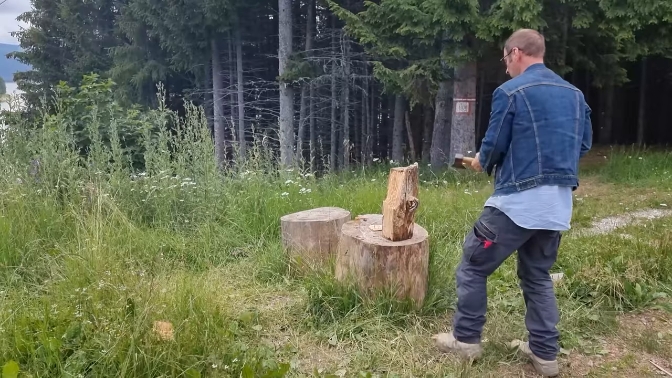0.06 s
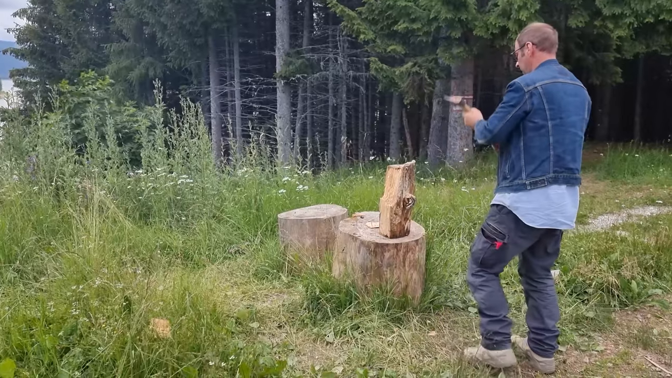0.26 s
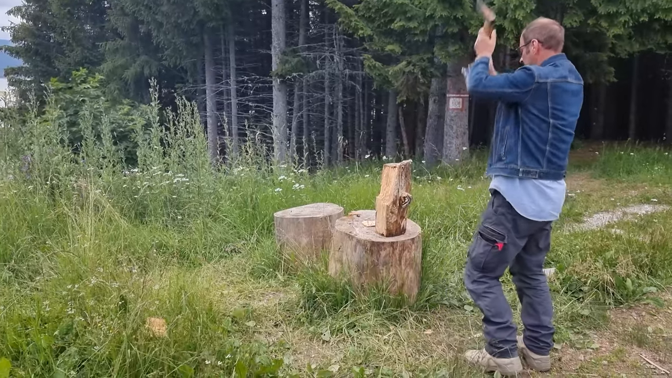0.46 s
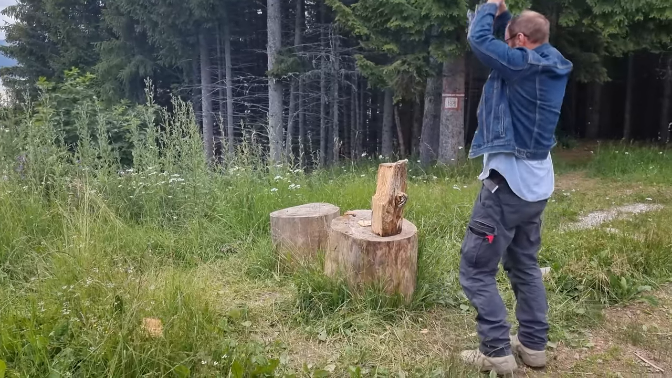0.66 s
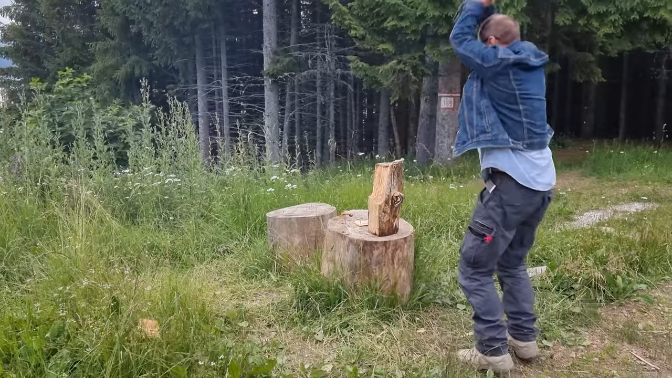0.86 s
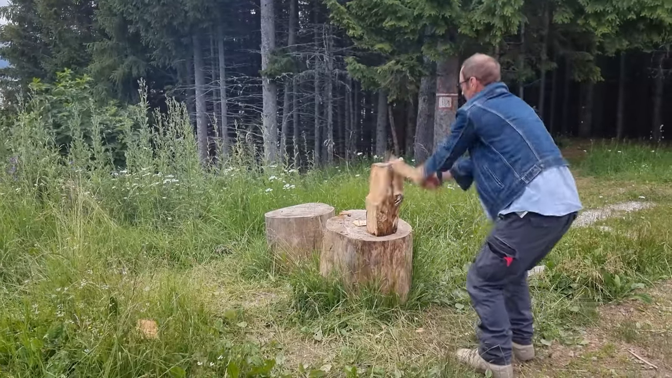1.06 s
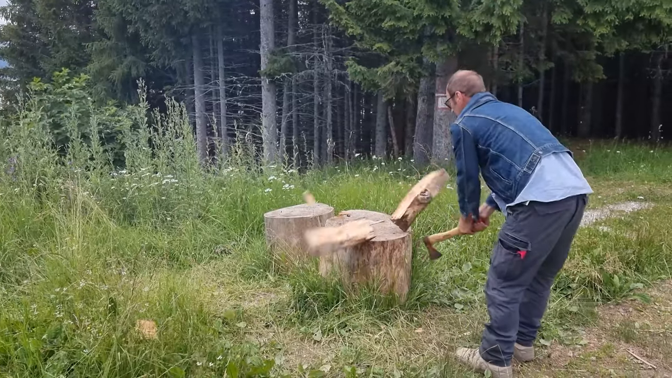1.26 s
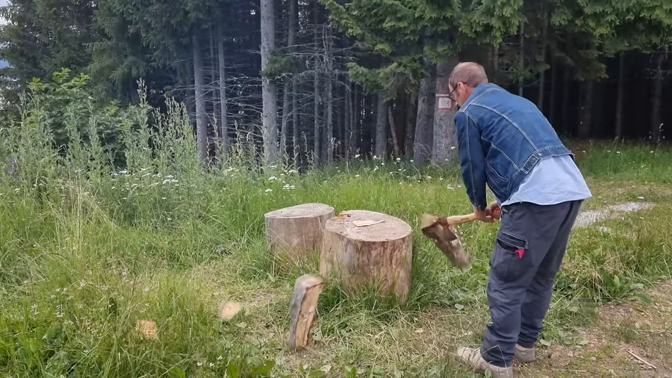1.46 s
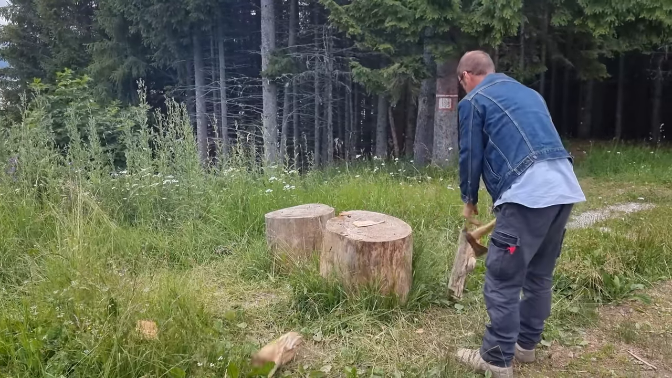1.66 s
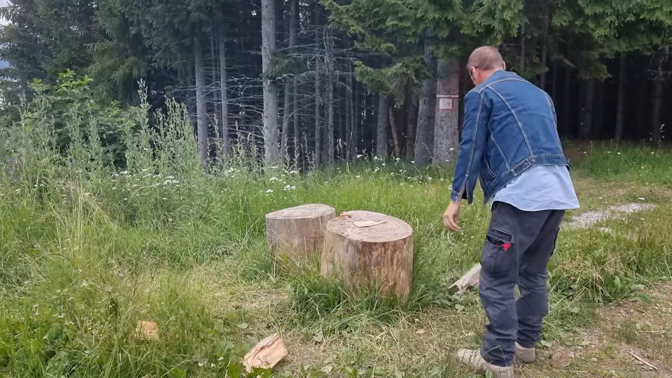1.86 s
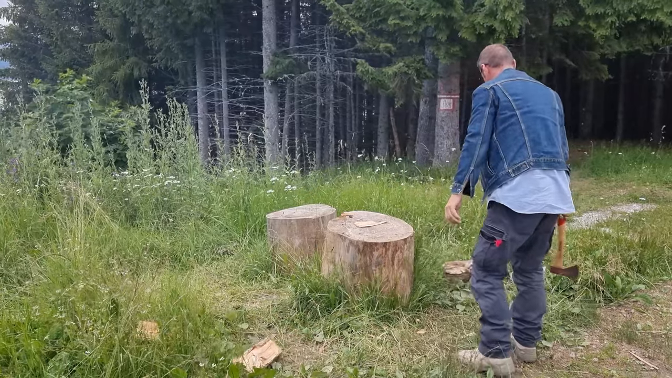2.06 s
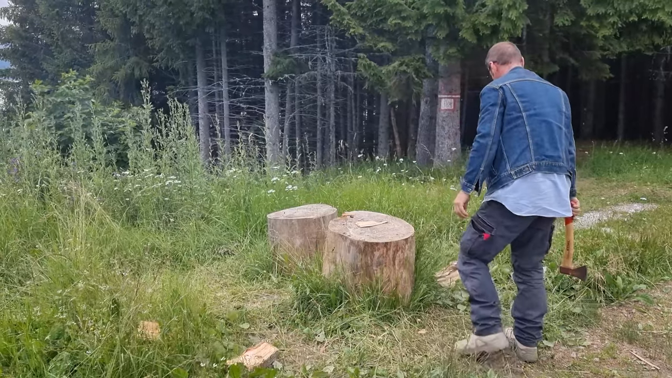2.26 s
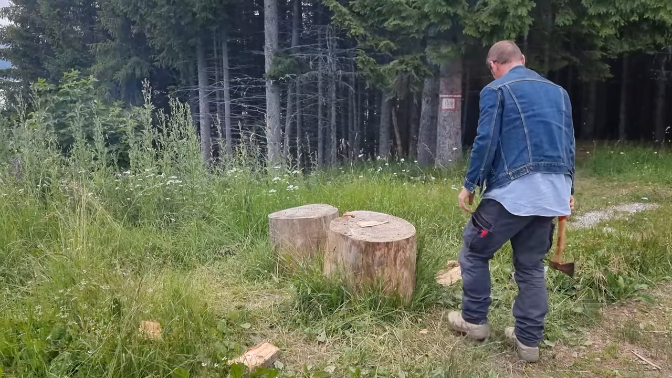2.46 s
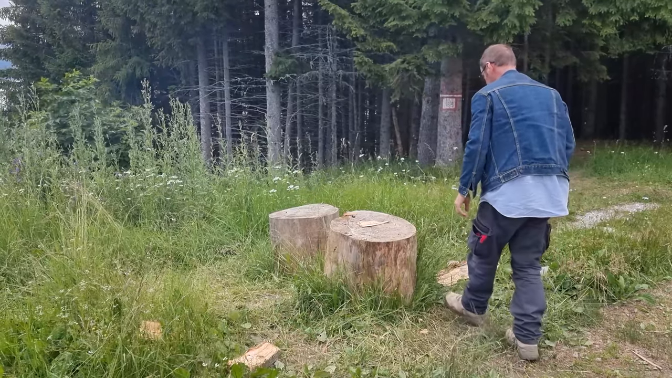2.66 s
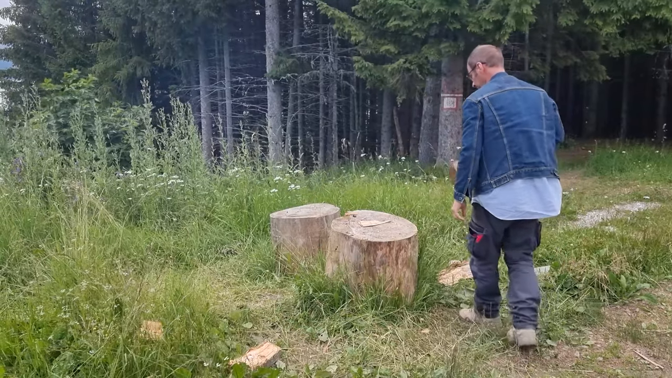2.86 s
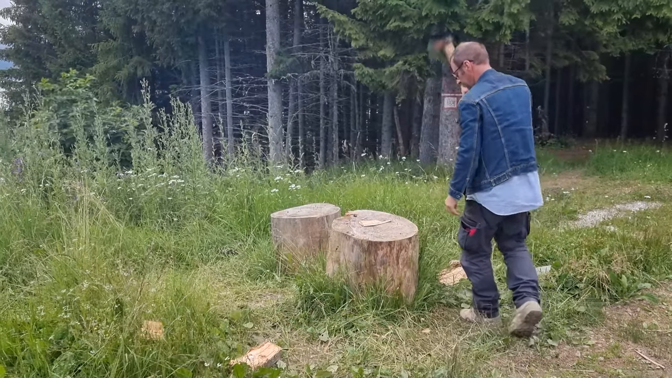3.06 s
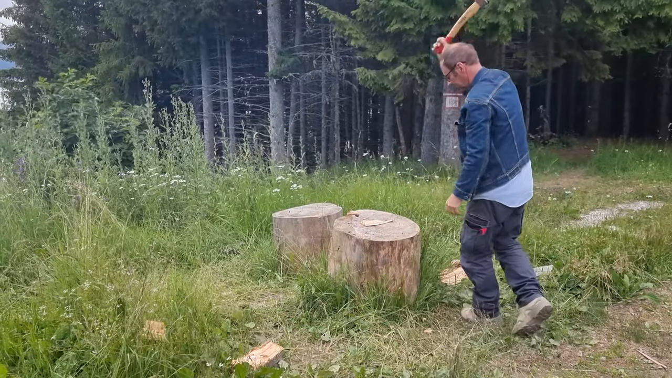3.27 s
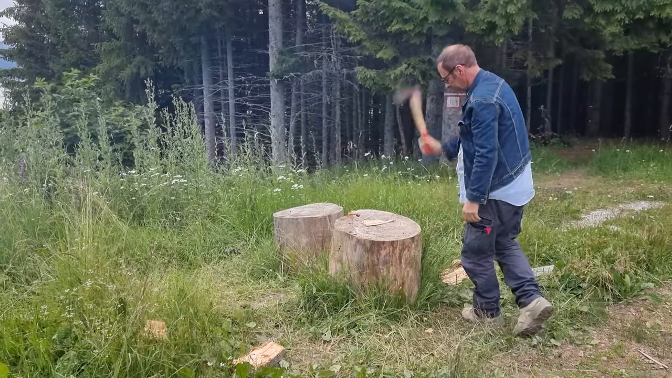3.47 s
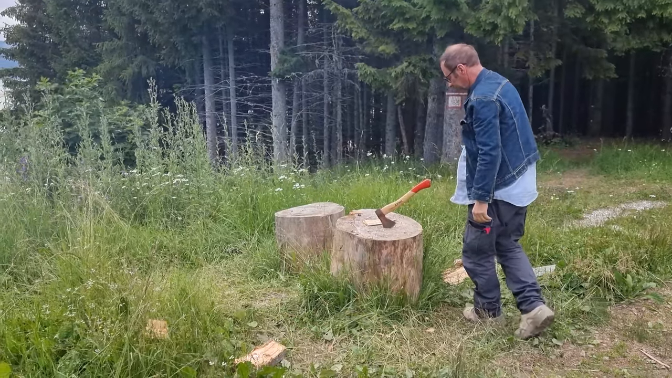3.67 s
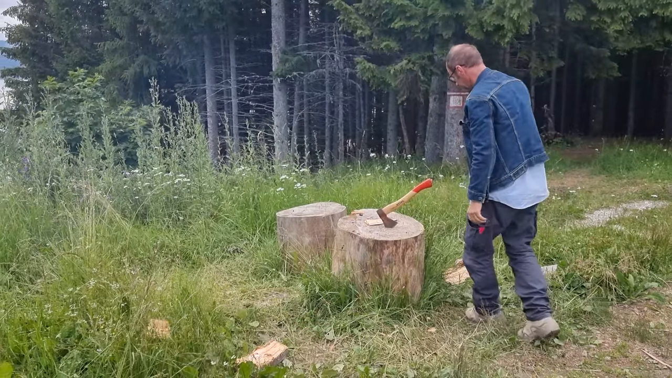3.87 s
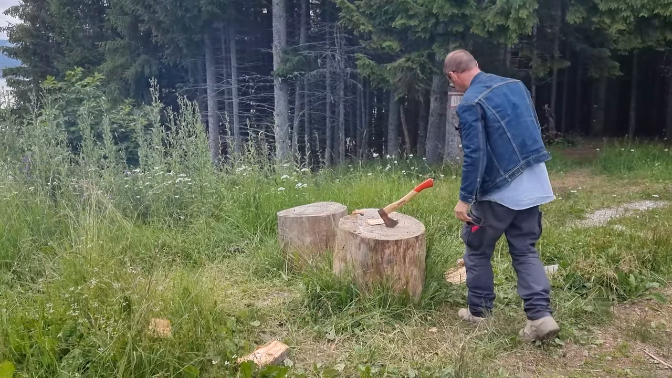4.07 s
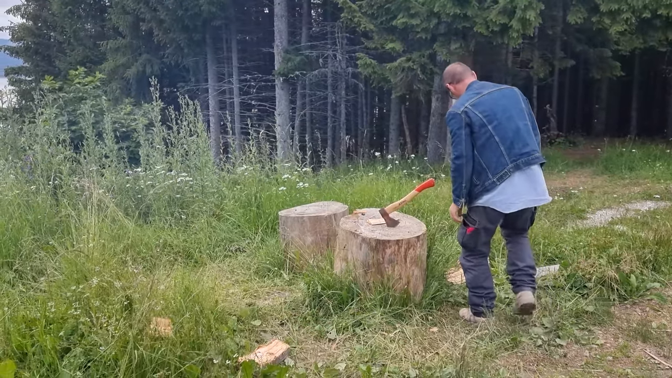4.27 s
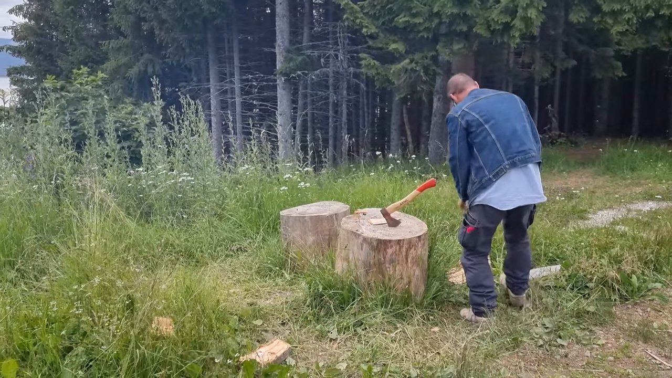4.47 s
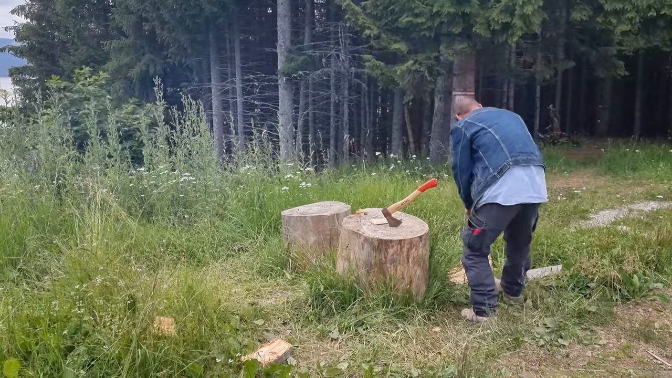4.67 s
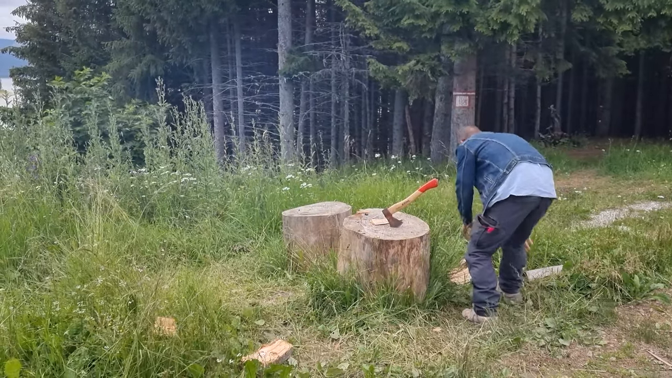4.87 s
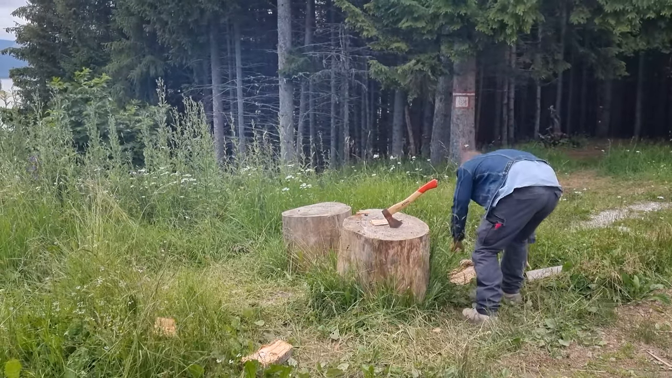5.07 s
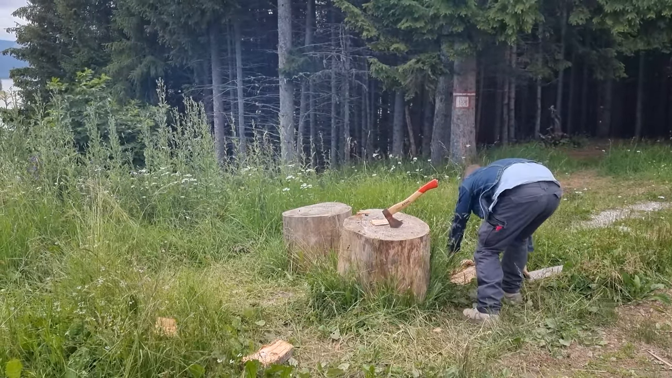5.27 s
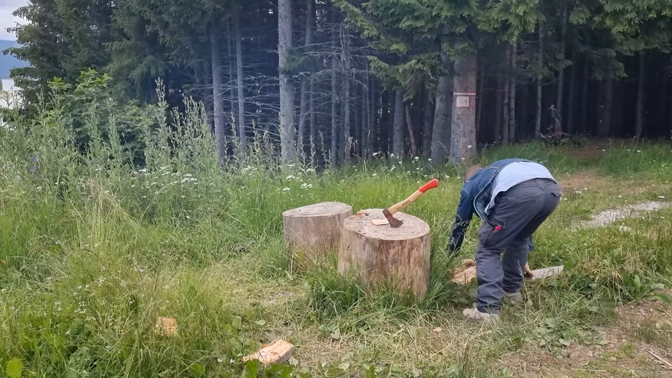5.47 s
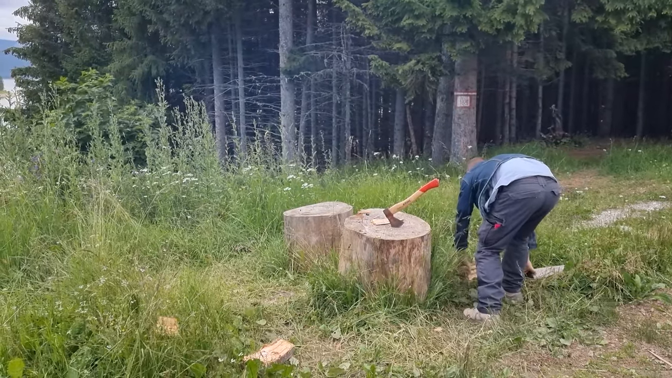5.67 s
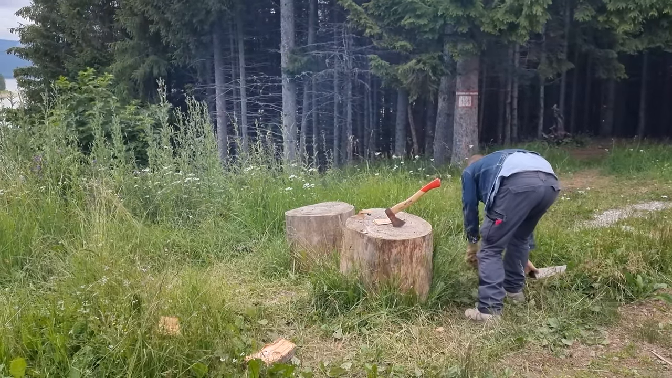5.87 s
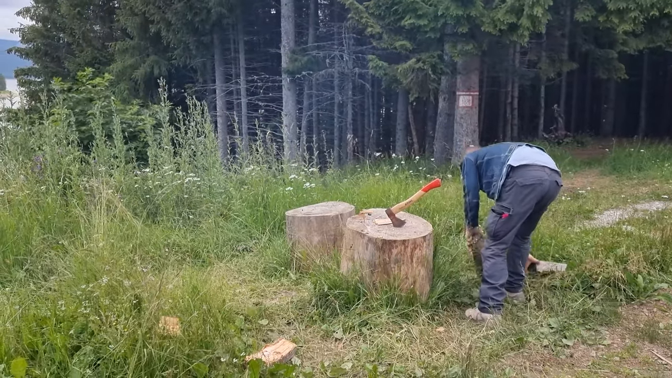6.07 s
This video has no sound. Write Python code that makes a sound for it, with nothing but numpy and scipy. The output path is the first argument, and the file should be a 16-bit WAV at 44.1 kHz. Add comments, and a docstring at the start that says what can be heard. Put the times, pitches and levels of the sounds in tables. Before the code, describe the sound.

A campfire on the left snaps irregularly over a faint low roar. After a second an axe splits a log with one very loud, dry, hollow crack that echoes briefly off the trees. The pieces thud softly into grass, cloth and grass rustle, then the axe sinks into the stump with a duller knock. A distant bird chips quickly; the fire keeps popping. Stereo phone microphones, outdoors at a few metres.

```python
"""A campfire, mostly on the left, pops and crackles over a soft roar: short noise bursts over slow noise.
Then an axe splits a log on a stump in a forest clearing: decaying wood tones plus a crack of noise.
The halves thud into the grass as low, fading tones; grass and clothes rustle; the axe sinks in the stump.
Far off a bird chips in rising tones. Nearby trunks send back slaps and a short tail, made of fading noise.
All of it reaches two phone microphones a hand apart."""
import sys
import numpy as np
from scipy import signal
from scipy.fft import rfft, irfft
from scipy.io import wavfile
from scipy.ndimage import uniform_filter1d

SR = 44100
rng = np.random.default_rng(int(sys.argv[2]) if len(sys.argv) > 2 else 0)


def unload_audio(sound):
    """Save the sound as a 16-bit wav file, at the path given as the first command line argument."""
    columns = np.transpose(np.atleast_2d(sound))
    # keep every value between -1 and 1, then stretch to whole-number steps
    steps = np.round(np.clip(columns, -1, 1) * 32767)
    wavfile.write(sys.argv[1], SR, steps.astype(np.int16))


N = 270333  # length in samples

# Levels are those before the microphones. "Left minus right" is how far the right channel is turned down.

# Blows on wood: t/s, body struck, knock level/dB, knock tilt/dB per octave, time to the push's peak/s,
# crack level/dB, crack tilt/dB per octave, fading time of the tearing/s
AXE_BLOWS = [(1.1939, "log", 0, 10, 0.00015, -10, -3.5, 0.0042),
             (1.1980, "log", 2.5, 2, 0.00016, -15, 0.5, 0.0028),
             (1.2066, "log", -31, -5, .0003, -21.5, -2.5, 0.006),
             (1.551, "log", -30, -2, 0.00026, -31, -1.5, 0.0065),
             (3.708, "stump", -29, -18.5, .0002, -25.5, -1, 0.005),
             (3.712, "stump", -16, 0.5, 0.00068, -38, -10, 0.0058)]
# Tones of each struck body, before the tilt of a blow: f/Hz, level/dB, time to fall 60 dB/s
WOOD_MODES = {"log": [(154, -13, 0.042), (230, -19, 0.045), (331.6, -13, .035), (559, -9.5, 0.034),
              (816, -2, 0.031), (956.8, -3.5, 0.025), (1180, -4, 0.025), (1400, 0, 0.026),
              (1992, -5.5, 0.028), (3030, -11, 0.051), (3140, -9, .02)], "stump": [(110, -9.5, 0.07),
              (279, -7, 0.036), (503, 0.5, 0.036), (690, 5.5, 0.037), (906, 13, 0.032), (1260, 8, 0.052),
              (1460, -17, .02), (1870, 14.5, 0.046)]}
# Colour of tearing fibres, before the tilt of a blow: f/Hz, level/dB per Hz
CRACK_COLOUR = [(700, -24.5), (1400, -3), (2600, -16), (4000, -5.5), (6700, -12.5), (9000, -20),
                (16000, -28.5)]
# The axe rings once it is free of, or at rest in, the wood; steel head, then handle:
# t/s, f/Hz, level/dB before the soft start, time to fall 60 dB/s
RINGS = [(1.222, 6072, -24.5, .1), (1.24, 6072, -43, 0.55), (3.768, 482, -36, 0.12)]
# Wood landing on turf: t/s, level/dB of the lowest tone before its soft start, f/Hz
TURF_THUDS = [(1.238, -25.5, 70.8), (1.623, -44, 105), (1.645, -35, 86.2), (1.692, -19.5, 96.5),
              (1.711, -34, 42), (1.83, -27, 99), (1.86, -40, 49.4), (3.723, -30.5, 60.4), (3.762, -30, 128)]
# Grass and clothes brushed: t/s of the top, level/dB, rise/s, fall/s
BRUSHES = [(1.02, -65, 0.032, 0.089), (1.498, -41, 0.023, 0.034), (1.61, -58.5, 0.0088, 0.045),
           (1.68, -52.5, 0.068, 0.052), (1.829, -41, 0.039, 0.013), (1.879, -55.5, 0.025, 0.06),
           (2.0, -54, 0.037, 0.093), (2.301, -65, 0.06, 0.31), (2.6, -68, 0.074, 0.069),
           (4.62, -60.5, 0.073, 0.13), (4.8, -58, 0.027, 0.021)]
# Colour of the brushing: f/Hz, level/dB per Hz
GRASS_COLOUR = [(550, -7.5), (2200, -5.5), (4300, -3), (6500, -5.5), (9000, -12), (16000, -16.5)]

# Fire pops: t/s, rms level/dB over 23 ms, thump below 1 kHz/dB, tilt above it/dB per octave,
# left minus right/dB, level/dB of the slap from the trunks, which hangs on where in the fire it bursts
FIRE_POPS = [(0.0624, -55.5, -6.8, 2, 4, -28), (0.0978, -49.5, -2, -4, -2.6, -39),
             (0.2447, -64, -1, -1, 8, -23), (0.2869, -28.9, 6.5, -2, 5.3, -22.5),
             (0.4461, -61.5, -4, -1.5, 0.5, -27), (0.6445, -57, 1, -3.8, -3.1, -19),
             (0.6524, -45, -2, -6.5, -1.5, -32), (0.6601, -34.5, -4, 1, 2, -29),
             (0.7921, -61.2, 15, -5, 0.5, -23), (0.8263, -54.5, -2, 0.0, 5, -8.5),
             (0.9253, -51.5, -10, 4, 7, -26), (1.036, -47, -1, 2, 4, -15),
             (1.2987, -31.5, 13.5, -5, -1.3, -32), (1.41, -57, -1, -4, 3.5, -20),
             (1.479, -23.5, 12, -6.5, -0.5, -20.5), (1.5645, -62, 13, 1.7, 5, -21),
             (1.5906, -55.5, 3, -1.5, 4, -16.5), (1.8408, -48, -5.5, 5, 2.4, -16),
             (2.196, -56, 7, 5, 1.1, -22.5), (2.4759, -62.5, 10.5, -0.5, 2, -18),
             (2.7535, -59.5, 1.3, 2, 1, -20.5), (2.8045, -56.5, -3.5, 3, 3.5, -9.5),
             (2.94, -63, 2, -1, 2.0, -21.5), (3.036, -56, 8.5, -5, -1, -19),
             (3.051, -59, -2.3, 4, 3.5, -32), (3.2257, -55.5, -2, -0.5, 5.5, -23),
             (3.3454, -56.5, -5, -0.7, 2, -19), (3.3738, -56, -5.2, 2, 5.9, -20.5),
             (3.452, -59, 5.1, 1.5, 6.3, -28), (3.5015, -56, -8, 2, 4, -19),
             (3.5541, -51.5, -7, 0.5, 5, -25), (4.0542, -64.5, 9, 2.3, -2.7, -14),
             (4.1013, -52, 10, -1.6, 5, -13.5), (4.2871, -38, -4, -2.3, 1.5, -22.5),
             (4.5183, -40.5, -8, 2.5, 3.5, -19), (5.1261, -22.5, 3.7, -1.4, 5, -13),
             (5.1427, -22.5, 7, 5, -0.5, -25.5), (5.4264, -60, 4, 1.5, 1.5, -19.5),
             (5.4609, -61.5, 6.2, 0.5, 3, -21.5), (5.618, -60, 3.5, 0, 3, -16),
             (5.7671, -63, 3.5, 2, 5, -22.5), (5.7938, -46.5, -13, -4, -2, -16.5),
             (5.9, -68.5, 3, -3, 6, -22), (5.9685, -27, 0.5, 2.1, 4.2, -16), (6.0523, -50, 0, 12, 0, -15),
             (6.069, -56, -11, -1.5, -1, -13.5), (6.1155, -54, 3.4, -1.5, 3, -16)]
# Colour of a middling pop: f/Hz, level/dB per Hz
POP_COLOUR = [(150, -6), (600, -2), (1200, -1.5), (2000, 4.5), (3100, 3), (5100, 3), (7650, 1.5),
              (10400, -8), (12800, -2.5), (15500, -5.5)]

# Slaps of the fire from trunks: delay/s, level/dB against each pop's slap level, smear/s, left minus right/dB
FIRE_ECHOES = [(0.0146, -3.5, 0.0029, -2), (0.0639, -4, 0.0013, 0.5), (.066, -9, .015, -5)]
# Slaps of the blows from trunks: delay/s, level/dB, smear/s, left minus right/dB
STUMP_ECHOES = [(.025, -17, .0004, .5), (.0505, -18, .0006, 2)]
# What a near trunk sends back: f/Hz, level/dB
BARK_COLOUR = [(150, -6), (500, -3), (2000, -8), (8000, 0.5), (16000, -6)]
# Colour of the forest's tail after the fire and the bird: f/Hz, level/dB
FIRE_TAIL_COLOUR = [(200, -21), (700, -8.5), (2000, -10), (4500, -1), (7500, -8), (11000, -19),
                    (16000, -18.5)]
# Colour of the forest's tail after the blows: f/Hz, level/dB
STUMP_TAIL_COLOUR = [(150, -14), (400, -3.5), (800, -0.5), (1500, -4.5), (3000, -9), (5500, -13),
                     (8000, -28.5), (16000, -34)]

# Roar of the flames before its flutter: t/s, bass level/dB, hiss level/dB
FLAME_LEVELS = [(0.0, -66, -82), (0.13, -67.5, -70), (0.48, -54.5, -64), (0.75, -53.5, -62),
                (1.09, -47, -56.5), (1.37, -52, -58), (1.72, -44.5, -59), (1.96, -52.5, -56),
                (2.24, -53.5, -59), (3.3, -55.5, -60.5), (3.751, -52, -61), (4.062, -58, -60.5),
                (5.262, -55, -60), (5.6, -59.5, -60), (6.13, -56, -59)]
# Colour of the flames: f/Hz, level/dB per Hz
FLAME_COLOUR = [(15, -30.5), (25, -18), (54, 5), (87, 4.5), (192, -7.5), (426, -21.5), (750, -17),
                (941, -25), (1200, -28.5), (1560, -28.5), (2640, -120)]
# Colour of leaves and far air: f/Hz, level/dB per Hz
AIR_COLOUR = [(530, -14), (900, -25.5), (1620, -3.5), (2040, 2.5), (3260, -4), (6560, -5), (8350, -13.5),
              (10600, -15.5), (15100, -19), (16000, -6.5)]
# Response of the microphones: f/Hz, level/dB
MIC_RESPONSE = [(25, -11), (50, -3.5), (100, -1.5), (5000, -2), (6500, 1), (8500, -5), (10500, -2),
                (13000, -0.5), (15000, 2.5)]

THUD_CYCLES, THUD_RISE_S = 7.31, 0.004  # cycles of the lowest tone to fall 60 dB; time of the soft start
POP_RISE_S, POP_FALL_S, POP_RING_S, POP_RING_DB = 0.00032, 0.00061, 0.0043, -15
BANG_DB = -2.5  # the bare bang against the spit
FIRE_LAG = 21  # samples by which the left microphone hears the fire first
# Small random crackles: how many, the level of the softest, the average tilt per octave, left minus right
CRACKLE_PER_S, CRACKLE_DB, CRACKLE_TILT_DB, CRACKLE_PAN_DB = 7.5, -70.5, 1.5, 2.5
# The bird's trill; the gap runs from start to start, the level is the middle one
CHIPS, TRILL_AT_S, CHIP_GAP_S, CHIP_S, CHIP_DB = 5, 3.558, 0.0213, 0.012, -58
CHIP_START_HZ, CHIP_END_HZ = 3880, 5500
PATCHY_DB = 3.5  # trunks stand unevenly, so the tail comes in clumps
PORT_GAP_HZ = 537  # above this, sound from all round differs between the microphones
AIR_DB, AIR_SWELL_S = -66.5, 0.18  # the airy treble comes up from silence at the start
TOP_HZ = 16000  # the phone keeps nothing much above this


def undb(db):
    """Turns decibels into a plain multiplier."""
    return 10 ** (np.asarray(db, float) / 20)


def unit(x):
    """Scales a sound to an rms level of 1."""
    return x / np.sqrt(np.mean(x ** 2))


def colour(x, points):
    """Filters through (Hz, dB) points without sounding early, using the folded cepstrum of the log gain."""
    hz, db = np.transpose(points)
    size = 2 ** 12
    log_hz = np.log(np.fft.rfftfreq(size, 1 / SR) + 1)
    log_gain = np.interp(log_hz, np.log(hz), db) * np.log(10) / 20
    cepstrum = irfft(log_gain)
    # folding the second half onto the first puts the filter's energy as early as possible
    cepstrum[1:size // 2] *= 2
    cepstrum[size // 2 + 1:] = 0
    taps = irfft(np.exp(rfft(cepstrum)))[:size // 2]
    if np.ndim(x) > 1:
        taps = taps[None]
    return signal.fftconvolve(x, taps, axes=-1)[..., :np.shape(x)[-1]]


def add(out, s, sound, pan_db=0, lag=0):
    """Places a sound at s seconds; the right channel is pan_db softer and lag samples late."""
    sound = np.broadcast_to(sound, (2, np.shape(sound)[-1]))
    start = int(s * SR)
    for channel, first, gain in ((0, start, 1.0), (1, start + lag, undb(-pan_db))):
        part = sound[channel, :max(N - first, 0)]
        out[channel, first:first + len(part)] += part * gain


def walk(rate):
    """Random levels, rate of them a second, joined by ramps; spread near 1."""
    hold = int(SR / rate)
    steps = np.repeat(rng.standard_normal(N // hold + 1), hold)
    return uniform_filter1d(steps, hold)[:N]


def diffuse():
    """Noise from all round: alike in both microphones in the bass, unlike above."""
    mid, side = rng.standard_normal((2, N))
    high_pass = signal.butter(1, PORT_GAP_HZ, "high", fs=SR, output="sos")
    side = signal.sosfilt(high_pass, side)
    return np.array([mid + side, mid - side])


def ring(modes, phase, length=2 ** 13):
    """Struck bodies sound as a sum of tones (Hz, dB, seconds to fall 60 dB), each dying away."""
    t = np.arange(length) / SR
    hz, db, t60 = np.transpose(modes)[:, :, None]
    decay = np.exp(-np.log(1000) * t / t60)
    return np.sum(undb(db) * np.sin(2 * np.pi * hz * t + phase) * decay, axis=0)


def axe():
    """Each blow pushes the wood's tones while fibres tear with a crack; also returns the bare blows."""
    out, bare = np.zeros((2, 2, N))
    t = np.arange(2 ** 12) / SR
    for s, body, knock_db, knock_tilt_db, contact_s, crack_db, crack_tilt_db, tear_s in AXE_BLOWS:
        push = t / contact_s * np.exp(1 - t / contact_s)
        modes = [(hz, db + knock_tilt_db * np.log2(hz / 800), t60) for hz, db, t60 in WOOD_MODES[body]]
        # neighbouring tones start in opposite senses
        phase = np.pi * np.arange(len(modes))[:, None]
        phase = phase + 0.3 * rng.standard_normal((len(modes), 1))
        # the higher the tone, the more its phase differs between the microphones, up to a limit
        mode_hz = np.array(modes)[:, :1]
        skew = rng.choice([-1, 1], phase.shape) * np.minimum((mode_hz / 1500) ** 2, 0.9)
        knock = np.array([signal.fftconvolve(ring(modes, phase + side * skew), push)[:len(t)]
                          for side in (1, -1)])
        knock *= undb(knock_db) / np.abs(knock).max()

        fibres = 1.3 * rng.standard_normal((2, len(t))) + rng.standard_normal(len(t))
        spectrum = [(hz, db + crack_tilt_db * np.log2(hz / 2000)) for hz, db in CRACK_COLOUR]
        tearing = (1 - np.exp(-t / 0.000057)) * np.exp(-t / tear_s)
        crack = unit(colour(fibres, spectrum)) * tearing * undb(crack_db)
        add(out, s, knock + crack)
        add(bare, s, np.array([undb(knock_db)]))  # a single click
    return out, bare[0]


def axe_rings():
    """Lone tones of the axe's head and handle, swelling in over a few milliseconds."""
    out = np.zeros((2, N))
    swell = 1 - np.exp(-np.arange(2 ** 15) / SR / 0.009)
    for s, *mode in RINGS:
        add(out, s, ring([mode], 0, len(swell)) * swell, -1.5, 3)
    return out


def landing():
    """Wood thuds on soft turf as two low tones; brushed grass and clothes are swells of grainy noise."""
    out, t = np.zeros((2, N)), np.arange(N) / SR
    soft_start = 1 - np.exp(-t[:2 ** 13] / THUD_RISE_S)
    for s, db, hz in TURF_THUDS:
        t60 = THUD_CYCLES / hz
        thud = -ring([(hz, db, t60), (1.5 * hz, db - 2.5, t60 / 2)], 0)
        add(out, s, thud * soft_start, 1.5)

    swells = np.zeros(N)
    for s, db, rise_s, fall_s in BRUSHES:
        rise = np.exp(-((t - s) / rise_s) ** 2)
        fall = np.exp(-np.abs(t - s) / fall_s)
        swells += undb(db) * np.where(t < s, rise, fall)
    grains = diffuse() * undb(3.0 * walk(220))
    return out + unit(colour(grains, GRASS_COLOUR)) * swells


def fire():
    """Steam pockets burst in the logs: a spit of a millisecond, then a faint ring of char.
    Also returns the bare bangs, as they spread into the wood and as the near trunks get them."""
    out, bangs, slapped = np.zeros((3, 2, N))
    t = np.arange(2 ** 10) / SR
    fall = np.exp(-t / POP_FALL_S) + undb(POP_RING_DB) * np.exp(-t / POP_RING_S)
    shape = (1 - np.exp(-t / POP_RISE_S)) * fall

    crackles = []
    for when, strength, bright in rng.random((int(CRACKLE_PER_S * N / SR), 3)):
        level_db = CRACKLE_DB - 4 * np.log(strength)
        tilt_db = CRACKLE_TILT_DB + 6 * (bright - 0.5)
        crackles.append((when * N / SR, level_db, 0, tilt_db, CRACKLE_PAN_DB, -20))

    hz, db = np.transpose(POP_COLOUR)
    for s, rms_db, thump_db, tilt_db, pan_db, trees_db in list(FIRE_POPS) + crackles:
        both, own = rng.standard_normal(len(t)), rng.standard_normal((2, len(t)))
        both[int(POP_FALL_S * SR)] -= 3.0  # the wall of the pocket gives way at once
        change_db = np.where(hz < 1000, thump_db, tilt_db * np.log2(hz / 5000))
        spectrum = np.transpose([hz, db + change_db])
        pop = colour((both + 0.74 * own) * shape, spectrum)
        add(out, s - FIRE_LAG / 2 / SR, unit(pop) * undb(rms_db), pan_db, FIRE_LAG)
        click = 1.0 * (t == 0)
        bang = unit(colour(click, spectrum)) * undb(rms_db + BANG_DB)
        add(bangs, s, bang)
        add(slapped, s, bang * undb(trees_db))
    return out, bangs[0], slapped[0]


def bird():
    """Near-sine chips that sweep upward, roughened on their way through the branches."""
    out = np.zeros((2, N))
    hz = np.linspace(CHIP_START_HZ, CHIP_END_HZ, int(CHIP_S * SR))
    sweep = np.hanning(len(hz)) * np.sin(2 * np.pi * np.cumsum(hz) / SR)
    for k in range(CHIPS):
        rough = 1 + 0.4 * rng.standard_normal(2 ** 5).repeat(40)[:len(hz)]
        level = undb(CHIP_DB + 2.3 * rng.standard_normal())
        add(out, TRILL_AT_S + k * CHIP_GAP_S, level * rough * sweep, -3, -6)
    return out


def trunks(source, slaps):
    """The nearest trunks send sound back as slaps, each smeared into a short burst of noise."""
    echo, t = np.zeros((2, SR // 4)), np.arange(2 ** 11) / SR
    for delay_s, db, smear_s, pan_db in slaps:
        slap = colour(rng.standard_normal((2, len(t))) * np.exp(-t / smear_s), BARK_COLOUR)
        slap /= np.sqrt(np.sum(slap ** 2, axis=1, keepdims=True))
        add(echo, delay_s, undb(db) * slap, pan_db)
    return signal.fftconvolve(source[None], echo, axes=1)[:, :N]


def forest(source, spectrum, tail_db, start_s, t60):
    """The scattered tail of the wood beyond: fading noise that swells in as more trees answer."""
    t = np.arange(SR) / SR
    patches = undb(tail_db + PATCHY_DB * walk(110)[:SR])
    envelope = (1 - np.exp(-t / start_s)) * np.exp(-np.log(1000) * t / t60)
    echo = patches * rng.standard_normal((2, SR)) * envelope
    return signal.fftconvolve(source[None], colour(echo, spectrum), axes=1)[:, :N]


def background():
    """Flames flutter in the bass and hiss a little; a breeze buffets each port; leaves and air add treble."""
    s, bass_db, hiss_db = np.transpose(FLAME_LEVELS)
    t = np.arange(N) / SR
    breeze_colour = [(60, -4), (130, -24.5), (300, -37), (600, -48)]  # f/Hz, level/dB
    breeze = undb(5.5) * colour(rng.standard_normal((2, N)), breeze_colour)
    low_pass = signal.butter(2, 300, fs=SR, output="sos")
    high_pass = signal.butter(2, 240, "high", fs=SR, output="sos")
    bass = signal.sosfilt(low_pass, colour(diffuse(), FLAME_COLOUR) + breeze)
    hiss = signal.sosfilt(high_pass, colour(diffuse(), FLAME_COLOUR))
    bass_level = undb(np.interp(t, s, bass_db) + 1.5 * walk(12))
    hiss_level = undb(np.interp(t, s, hiss_db) + 1.4 * walk(32))

    air = unit(colour(rng.standard_normal((2, N)), AIR_COLOUR))
    air_level = undb(AIR_DB + 0.43 * walk(18)) * (1 - np.exp(-t / AIR_SWELL_S))
    return unit(bass) * bass_level + unit(hiss) * hiss_level + air * air_level


def scene():
    """Axe, falling wood, fire and bird with the echoes of the woods, over the background."""
    blows, bare = axe()
    pops, bangs, slapped = fire()
    chips = bird()
    echoes = trunks(slapped, FIRE_ECHOES) + trunks(blows[0], STUMP_ECHOES)
    echoes += forest(bangs + chips[1], FIRE_TAIL_COLOUR, tail_db=-48.0, start_s=0.0055, t60=0.86)
    echoes += forest(bare, STUMP_TAIL_COLOUR, tail_db=-21.5, start_s=0.041, t60=0.55)
    return blows + axe_rings() + landing() + pops + chips + echoes + background()


def record(dry):
    """The microphone ports resonate near the top; the phone rounds the loudest peaks and cuts the top."""
    heard = colour(dry, MIC_RESPONSE)
    rounded = heard / (1 + heard ** 8) ** 0.125
    top_cut = signal.ellip(8, 0.2, 70, TOP_HZ, fs=SR, output="sos")
    return signal.sosfilt(top_cut, rounded)


dry = scene()
out = record(dry)
unload_audio(out)
```